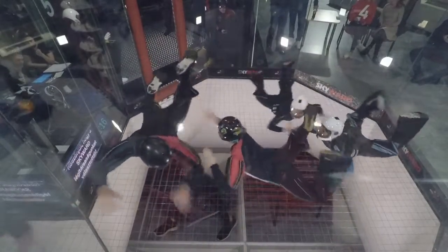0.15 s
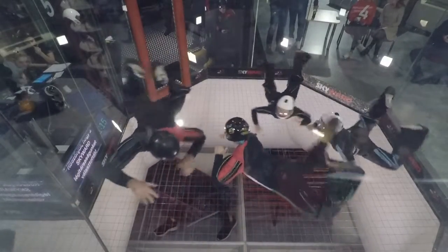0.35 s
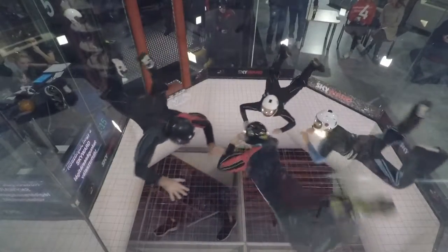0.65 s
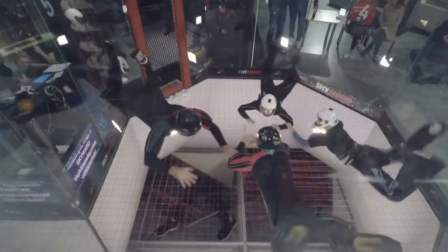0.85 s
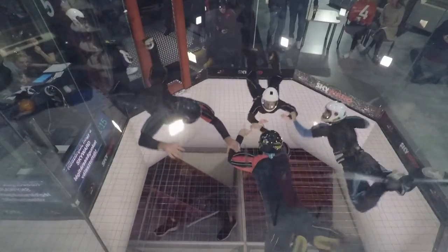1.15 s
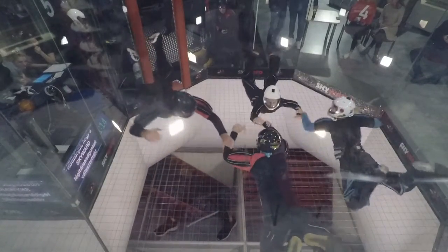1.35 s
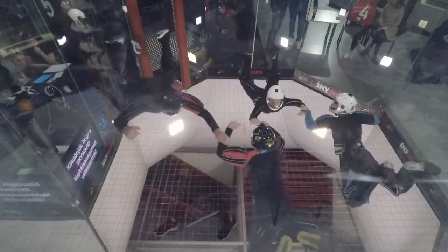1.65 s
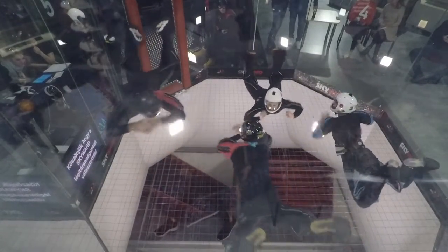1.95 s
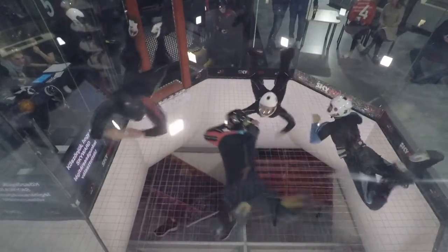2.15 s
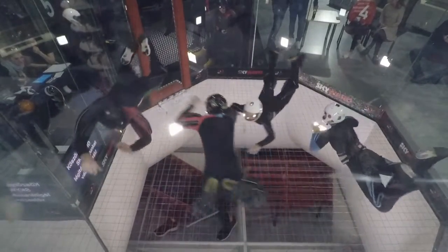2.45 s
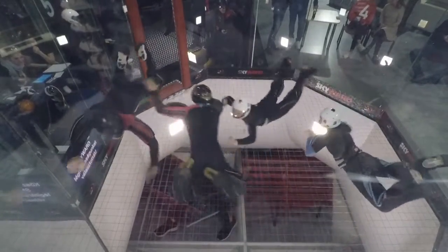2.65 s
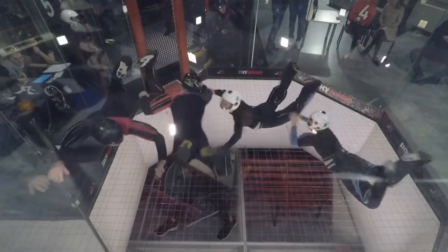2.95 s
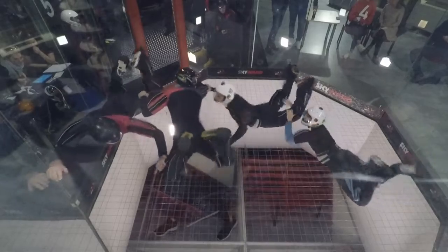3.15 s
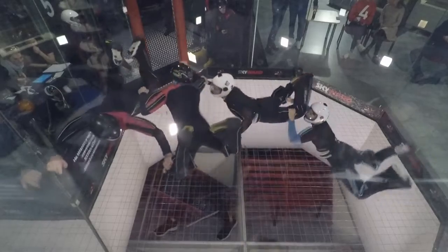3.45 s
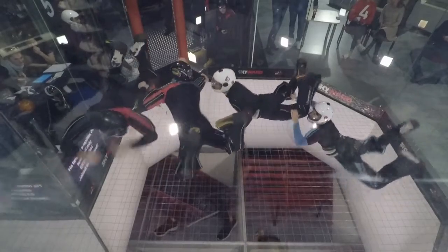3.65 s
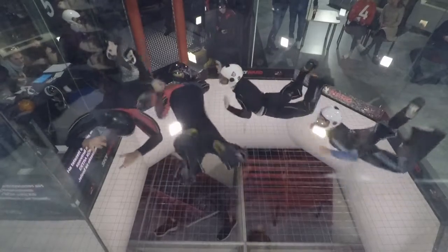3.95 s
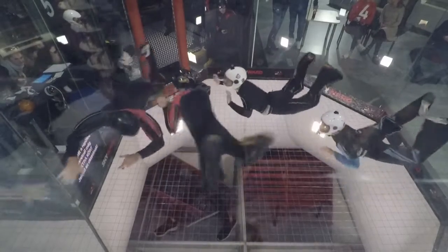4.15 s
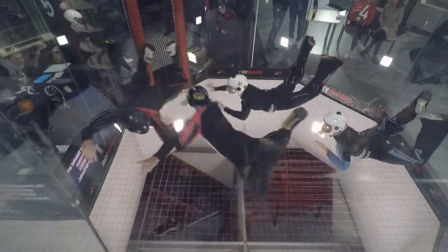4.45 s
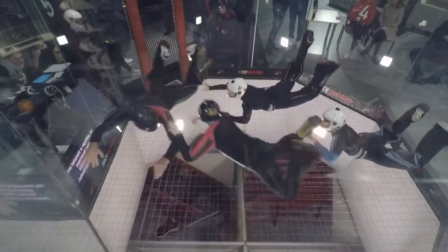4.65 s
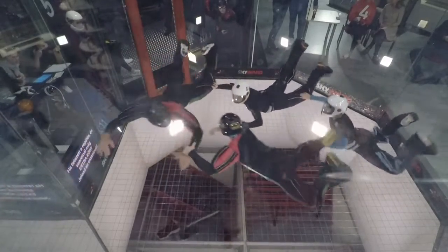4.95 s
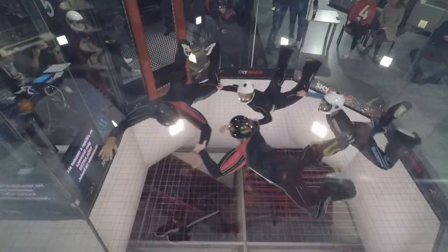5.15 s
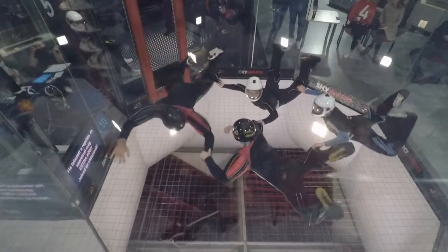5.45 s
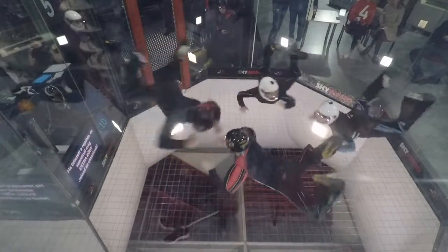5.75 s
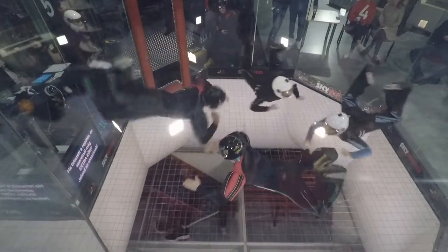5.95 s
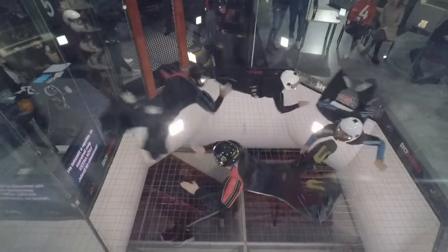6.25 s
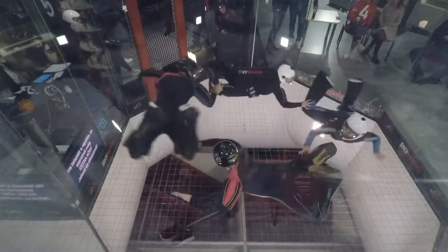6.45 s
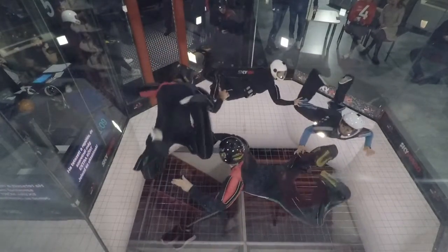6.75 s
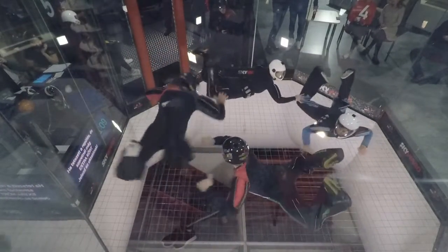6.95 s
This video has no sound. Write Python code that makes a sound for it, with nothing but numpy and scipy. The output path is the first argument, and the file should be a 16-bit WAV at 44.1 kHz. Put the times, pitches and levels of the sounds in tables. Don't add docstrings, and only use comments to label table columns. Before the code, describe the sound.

Heard from a camera mounted on a wind tunnel wall, its housing muffling the air: thick low roar, little hiss, and a deep throbbing fan hum that weakens early and slowly grows back. Low thumping gusts come and go. Close, dry clicking rattles flutter in short clusters throughout, strongest in the first second or so, with one faint passing whistle near two seconds.

```python
import sys
import numpy as np
from scipy import signal
from scipy.fft import rfft, irfft, next_fast_len
from scipy.io import wavfile
from scipy.ndimage import uniform_filter1d

SR = 44100
rng = np.random.default_rng(int(sys.argv[2]) if len(sys.argv) > 2 else 0)


def attenuation_scalar(level_db):
    decades = np.asarray(level_db, float) / 20
    return 10 ** decades


def transcribe(u):
    v = np.clip(np.atleast_2d(u).T, -1, 1)
    q = np.round(v * 32767).astype(np.int16)
    wavfile.write(sys.argv[1], SR, q)


N = 312669
T = np.arange(N) / SR

BLADE_HZ, FIRST_BEAT_S = 72.33, 0.0045
BEATS = FIRST_BEAT_S + np.arange(int((N / SR - FIRST_BEAT_S) * BLADE_HZ)) / BLADE_HZ
TAP_SAMPLES = 880


def curves(table):
    seconds, *columns = np.transpose(table)
    return [np.interp(T, seconds, column) for column in columns]


def unit(x):
    return x / np.sqrt(np.mean(x ** 2))


def walk(rate):
    hold = int(SR / rate)
    steps = np.repeat(rng.standard_normal(N // hold + 1), hold)
    return unit(uniform_filter1d(uniform_filter1d(steps, hold), hold)[:N])


def fans():
    # time in seconds, level in dB.
    beat_level = [
        (0.0, -19),
        (0.2, -24.5),
        (0.57, -33.5),
        (0.83, -26),
        (1.12, -27.5),
        (4.29, -18.5),
        (4.74, -29.5),
        (4.78, -19),
        (6.4, -18.5),
        (7.09, -18.5),
    ]
    # level in dB, dB per dB of beat, wander in dB.
    overtones = [(-25, -0.46, 1.5), (-34.5, -.5, 5)]
    # multiple of the blade rate, level in dB.
    high_orders = [(5, -37), (6, -58.5)]
    lag_rad = 0.4
    phase = 2 * np.pi * BLADE_HZ * (T - FIRST_BEAT_S) - lag_rad + 0.11 * walk(1.66)
    beat_db, = curves(beat_level)
    out = attenuation_scalar(beat_db - 0.2) * np.cos(phase)
    for order, (db, slope, wander_db) in enumerate(overtones, start=2):
        level_db = db + slope * (beat_db + 24) + wander_db * walk(1.55)
        out += attenuation_scalar(level_db) * np.cos(order * phase + order - 1)
    for order, db in high_orders:
        out += attenuation_scalar(db + np.clip(9.2 * walk(1.1), -9, 4)) * np.cos(int(order) * phase)
    return np.sqrt(2) * out


def surges(table):
    spread = 0.6
    return sum(attenuation_scalar(db) * np.exp(-((T - start - length / 2) / (spread * length)) ** 2)
               for start, length, db in table)


def boom():
    # frequency in Hz, width in Hz, resting level in dB, gain in a surge in dB.
    modes = [(39.1, 15.2, -22, -1), (51.1, 7.2, -26, -4), (180.84, 7.4, -28.5, -0.5),
             (250, 26.3, -28.5, 0.5)]
    # start in seconds, length in seconds,
    # level in dB.
    deep_surges = [(0.02, 0.078, -11.5), (0.49, 0.034, -15), (0.635, 0.064, -16), (0.948, 0.038, -14),
                   (1.077, 0.064, -20), (1.273, 0.038, -26), (1.479, 0.132, -14), (1.664, 0.035, -17),
                   (1.722, 0.05, -15.5), (2.035, 0.1, -13), (2.221, 0.055, -16.5), (2.506, 0.089, -14),
                   (2.828, 0.082, -13), (3.299, 0.042, -17), (3.366, 0.1, -13), (3.596, 0.061, -15),
                   (3.902, 0.062, -15), (4.064, 0.03, -15), (4.284, 0.089, -17), (4.4, 0.051, -19),
                   (4.478, 0.088, -18.5), (4.73, 0.046, -14), (4.846, 0.036, -20), (4.981, 0.052, -12),
                   (5.222, 0.062, -14), (5.435, 0.025, -15), (5.782, 0.033, -15), (6.148, 0.046, -14),
                   (6.55, 0.038, -10.5), (6.695, 0.07, -9.5)]
    middle_surges = [(0.301, 0.034, -30), (0.551, 0.052, -22), (0.669, 0.19, -18), (0.856, 0.26, -20.5),
                     (1.437, 0.03, -28), (1.856, 0.148, -24), (2.149, 0.068, -15.5), (2.333, 0.039, -18),
                     (2.568, 0.031, -25), (3.173, 0.045, -22), (3.255, 0.096, -15.5), (3.61, 0.067, -18),
                     (4.248, 0.091, -18.5), (4.933, 0.126, -16), (5.122, 0.042, -21.5),
                     (5.436, 0.036, -23.5), (5.573, 0.043, -19), (5.681, 0.064, -20.5), (5.903, 0.036, -21),
                     (6.208, 0.042, -27)]
    upper_surges = [(0.048, 0.15, -25), (0.537, 0.048, -18.5), (0.754, 0.106, -19.5), (0.928, 0.045, -22),
                    (1.231, 0.03, -19.5), (1.349, 0.045, -20.5), (2.395, 0.11, -19.5),
                    (2.548, 0.038, -18.5), (3.177, 0.029, -18.5), (3.269, 0.034, -17), (4.005, 0.048, -20),
                    (4.536, 0.036, -15.5), (4.791, 0.024, -20), (5.452, 0.056, -14.5), (6.583, 0.049, -20)]
    deep = surges(deep_surges)
    swells = (deep, deep, surges(middle_surges), surges(upper_surges))
    out = 0
    for (hz, width_hz, rest_db, surge_db), swell in zip(modes, swells):
        pole = np.exp(2j * np.pi * hz / SR - np.pi * width_hz / SR)
        z = signal.lfilter([1], [1, -pole], rng.standard_normal(N))
        z = signal.lfilter([1], [1, -pole], z)
        tone = unit(z.real / (abs(z) + 1e-9) ** 0.65)
        out = out + np.hypot(attenuation_scalar(rest_db), attenuation_scalar(surge_db) * swell) * tone
    return out


def stream_noise(points, lo_hz, hi_hz, flicker_db, rate):
    # frequency in Hz, width in Hz, level in dB.
    standing = [(91.4, 9.1, 2), (100.7, 2.9, -5.5), (163, 3.3, -13), (222, 3.5, -1), (221, 6.8, -2.5),
                (315.5, 3.2, 8.5), (392, 6.6, 0.5), (467, 5.3, 0), (1763, 49, 6), (2290, 110, 5.5),
                (2965, 300, 9)]
    size = next_fast_len(N, real=True)
    hz = np.maximum(np.arange(size // 2 + 1) * SR / size, 1)
    point_hz, point_db = np.array(points).T
    db = np.interp(np.log(hz), np.log(point_hz), point_db, left=-80, right=-80)
    for centre, width, gain_db in standing:
        db = db + gain_db / (1 + ((hz - centre) / width) ** 2)
    spectrum = rfft(rng.standard_normal(size)) * attenuation_scalar(db)
    inside = spectrum[(hz > lo_hz) & (hz < hi_hz)]
    spectrum = spectrum * size / np.sqrt(2 * np.sum(abs(inside) ** 2))
    octave = np.log2(hz / point_hz[0])
    out = np.zeros(N)
    for k in range(int(np.log2(point_hz[-1] / point_hz[0])) + 2):
        band = np.cos(np.pi / 2 * np.clip(octave - k, -1, 1)) ** 2
        out += attenuation_scalar(flicker_db * walk(rate)) * irfft(spectrum * band, size)[:N]
    return out


def stream():
    # frequency in Hz, level in dB per Hz.
    roar_colour = [(20, 3), (30, 10.5), (60, 1.5), (130, 2.5), (300, 2.5), (500, -2), (750, 0), (1000, -3),
                   (1200, -12), (1600, -23), (2500, -65.5)]
    hiss_colour = [(900, -4), (1500, -2), (2000, -4), (2600, -11.5), (3450, -16), (4400, -4), (5000, -11),
                   (5700, -24.5), (7000, -54)]
    sizzle_colour = [(4500, -9), (6000, 2.5), (7000, -3), (8000, -17), (9500, -28)]
    roar = stream_noise(roar_colour, lo_hz=282, hi_hz=1230, flicker_db=-0.25, rate=12)
    hiss = stream_noise(hiss_colour, lo_hz=1390, hi_hz=3450, flicker_db=0.76, rate=15)
    sizzle = stream_noise(sizzle_colour, lo_hz=5840, hi_hz=8500, flicker_db=4.5, rate=12)
    gust = walk(1.44)
    out = attenuation_scalar(-17.5 + 0.9 * gust) * roar
    out += attenuation_scalar(-41 + 0.2 * gust) * hiss
    out += attenuation_scalar(-67 + 0.3 * gust) * sizzle
    return out


def taps():
    # first swing in seconds, duration in seconds, swings a second, reach in dB.
    bouts = [(0.014, -0.007, 12.5, -24), (0.058, 0.166, 13.0, -43.5), (0.263, 0.083, 14.5, -31.5),
             (0.391, 0.09, 13.25, -31.0), (0.526, 0.149, 12.625, -30.5), (0.813, 0.207, 15.75, -29.5),
             (1.072, 0.145, 13.25, -27.5), (1.271, 0.083, 14.125, -37), (1.589, 0.014, 16.5, -31),
             (1.716, 0.024, 13.125, -31), (1.996, 0.09, 12.5, -45.5), (2.205, 0.2, 15.875, -33.5),
             (2.473, 0.138, 15.875, -34), (2.675, 0.2, 15.0, -29.5), (3.107, 0.069, 12.625, -38),
             (3.237, 0.135, 16.75, -34.5), (3.575, 0.197, 16.125, -37.0), (3.906, 0.059, 15.25, -35.0),
             (4.044, 0.211, 14.125, -34.5), (4.318, 0.121, 18.375, -43.5), (4.562, 0.328, 15.75, -39),
             (4.959, 0.069, 17.375, -33.0), (5.16, 0.076, 16.75, -34), (5.3, 0.059, 18.875, -43.0),
             (5.452, 0.2, 16.375, -34.5), (5.792, 0.135, 16.5, -35), (6, 0.194, 15.375, -32.5),
             (6.269, 0.283, 14.75, -37), (6.683, 0.076, 15.75, -36.5), (6.904, 0.145, 15.0, -44)]
    # time in seconds, level in dB.
    lone_taps = [(0.7078, -47), (0.7204, -51), (1.5374, -42), (1.8143, -49), (1.8557, -40), (1.9245, -50),
                 (2.1316, -46), (3.0165, -49), (3.5004, -48), (3.8187, -48), (3.8327, -47), (3.8464, -48),
                 (5.4216, -50), (6.6104, -50), (6.8603, -36)]
    swing_depth_db, contact_db, hardest_db, stray_db = 19.5, -52, -39, -73.5
    scatter_db, lean_s, jitter_s = 2, 0.003, 0.0004
    first, lasts, rate, reach_db = np.transpose(bouts)[:, :, None]
    turn = (BEATS - first) * rate
    swinging = (turn > -0.5) & (BEATS < first + lasts)
    db = np.where(swinging, reach_db + swing_depth_db * (np.cos(2 * np.pi * turn) - 1), -99)
    bout, beat = db.argmax(axis=0), np.arange(len(BEATS))
    scatter, jitter, stray = rng.standard_normal((len(BEATS), 3)).T
    swung = attenuation_scalar(db[bout, beat] - 2.0 + scatter_db * scatter)
    swung = swung / np.hypot(1, (attenuation_scalar(contact_db) / swung) ** 2)
    lone_s, lone_db = np.transpose(lone_taps)
    lone_beat = np.round((lone_s - FIRST_BEAT_S) * BLADE_HZ).astype(int)
    swung = swung + np.bincount(lone_beat, attenuation_scalar(lone_db - 3.0), len(BEATS))
    size = swung / np.hypot(1, swung / attenuation_scalar(hardest_db))
    size = size + attenuation_scalar(stray_db + 5 * np.clip(stray, -3, 2))
    lean = turn[bout, beat] - np.round(turn[bout, beat])
    seconds = BEATS - lean_s * lean + jitter_s * jitter
    return seconds[:, None], size[:, None]


def ring(modes, rise_s, scatter_db):
    t = np.arange(TAP_SAMPLES) / SR
    out = np.zeros((len(BEATS), TAP_SAMPLES))
    for hz, db, t60 in modes:
        strength, detune, turn = rng.standard_normal((len(BEATS), 3)).T[:, :, None]
        fade = (1 - np.exp(-(t / rise_s) ** 2)) * np.exp(-np.log(1000) * t / t60)
        wave = np.sin(2 * np.pi * hz * (1 + 0.0057 * detune) * t + 1.3 * turn)
        out += attenuation_scalar(db + scatter_db * strength) * fade * wave
    return out


def scrape(lo_hz, hi_hz, rise_s, fall_s):
    t = np.arange(TAP_SAMPLES) / SR
    band = signal.butter(2, [lo_hz, hi_hz], "band", fs=SR, output="sos")
    grit = signal.sosfilt(band, rng.standard_normal((len(BEATS), TAP_SAMPLES)))
    return grit * (1 - np.exp(-(t / rise_s) ** 2)) * np.exp(-t / fall_s)


def rattle():
    # frequency in Hz, level in dB, 60 dB decay in seconds.
    shell_low = [(2300, -1, .012), (2900, -2, .012), (3725, -1, .03), (4360, 0, .018), (5150, -6, .01),
                 (5550, -6, .014)]
    shell_high = [(6300, -9, .007), (7150, -12, .016), (7840, -12, .018), (9200, -15, .008),
                  (9950, 3, .006), (10700, -4, .007), (11600, -8, .008), (12400, -1.5, .007),
                  (13800, -8, .006), (14600, -13, .007), (15200, -11, .008)]
    seconds, size = taps()
    click = attenuation_scalar(1.5) * ring(shell_high, rise_s=0.00011, scatter_db=2.5)
    buzz = attenuation_scalar(-12) * scrape(4500, 16000, rise_s=0.0003, fall_s=0.0043)
    crack = attenuation_scalar(-2) * scrape(5500, 15600, rise_s=0.0001, fall_s=0.0006)
    low = attenuation_scalar(6.5) * ring(shell_low, rise_s=0.00028, scatter_db=2.1)
    low += attenuation_scalar(14.5) * scrape(2500, 4330, rise_s=0.00027, fall_s=0.0032)
    low_scatter = attenuation_scalar(0.81 * rng.standard_normal(seconds.shape))
    out = np.zeros(N + TAP_SAMPLES)
    at = (seconds * SR).astype(int) + np.arange(TAP_SAMPLES)
    np.add.at(out, at, size * (click + buzz + crack + low_scatter * low))
    return out[:N]


def edge_tone():
    # time in seconds, pitch in Hz, level in dB.
    whistle = [
        (1.85, 2870, -73),
        (1.9, 2867, -64),
        (1.96, 2910, -53),
        (2.02, 2900, -50),
        (2.07, 2980, -44.5),
        (2.13, 2960, -49),
        (2.19, 2860, -45),
        (2.25, 2720, -64),
        (2.3, 2680, -82),
    ]
    hz, db = curves(whistle)
    phase = 2 * np.pi * np.cumsum(hz + 25 * walk(60)) / SR
    return np.sqrt(2) * attenuation_scalar(db + 1.5 * walk(28)) * np.sin(phase)


def microphone_noise():
    # frequency in Hz, level in dB per Hz.
    self_noise = [(3000, -19), (7000, -2.5), (12500, 4), (14000, -4), (15700, -9)]
    return attenuation_scalar(-67) * stream_noise(self_noise, lo_hz=8000, hi_hz=12900, flicker_db=0.0, rate=23)


def scene():
    mix = fans() + boom() + stream() + rattle() + edge_tone() + microphone_noise()
    return mix[None]


def top_cut(x):
    return signal.sosfilt(signal.butter(12, 15830, fs=SR, output="sos"), x)


def record(dry):
    dry = signal.sosfilt(signal.butter(2, 25, "high", fs=SR, output="sos"), dry)
    loud = signal.lfilter([1], [1, -np.exp(-1 / (0.09 * SR))], dry ** 2, axis=1)
    held = dry * (np.mean(loud) / (loud + 0.19 * np.mean(loud))) ** 0.12
    mix = np.tanh(0.78 * held) / 0.81 * attenuation_scalar(1.0)
    return top_cut(mix)


dry = scene()
out = record(dry)
transcribe(out)
```